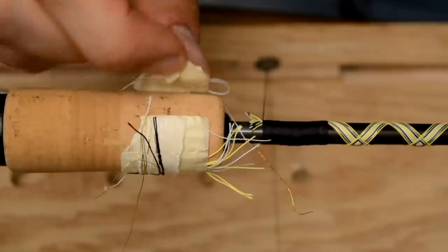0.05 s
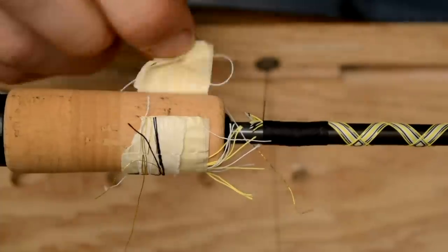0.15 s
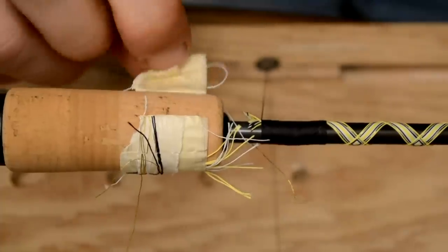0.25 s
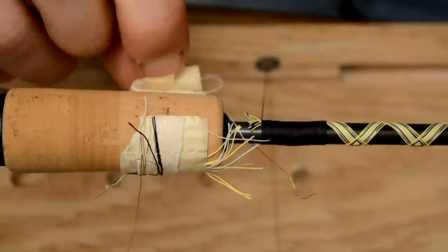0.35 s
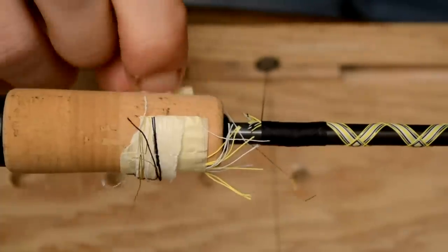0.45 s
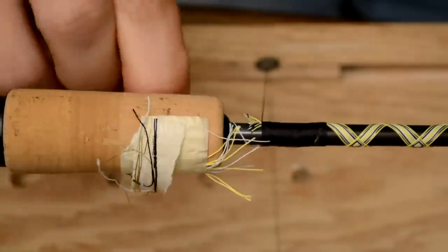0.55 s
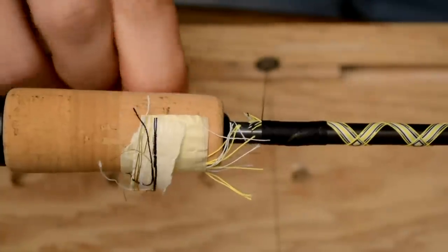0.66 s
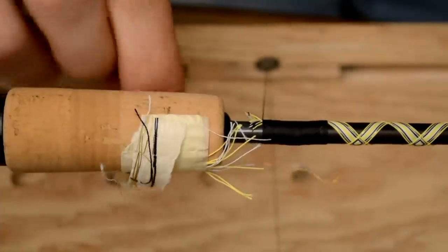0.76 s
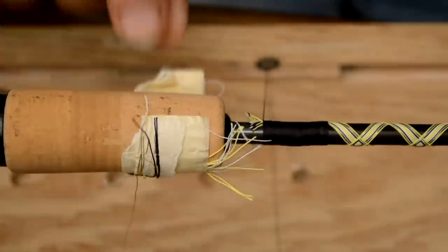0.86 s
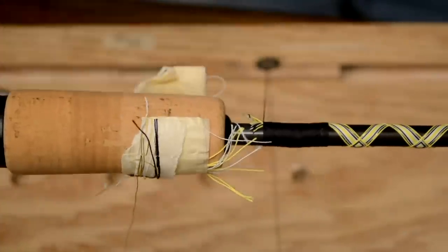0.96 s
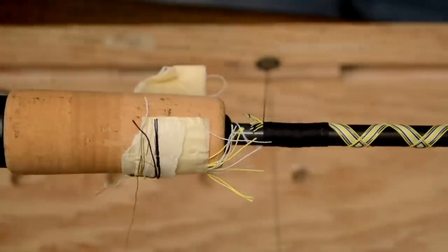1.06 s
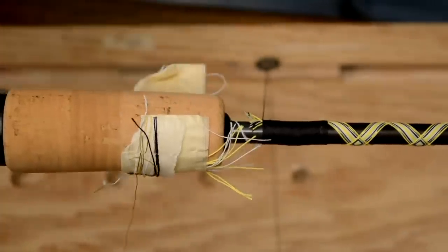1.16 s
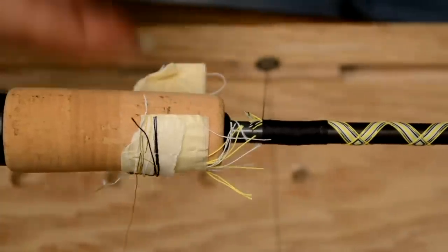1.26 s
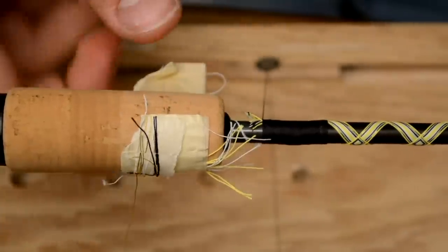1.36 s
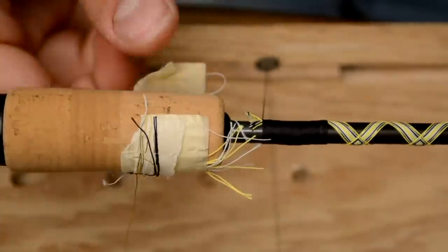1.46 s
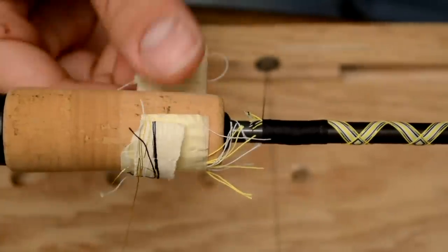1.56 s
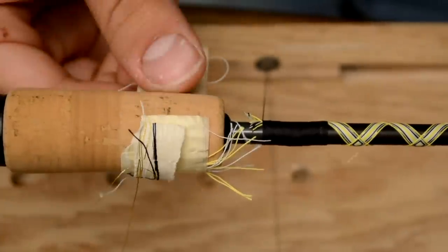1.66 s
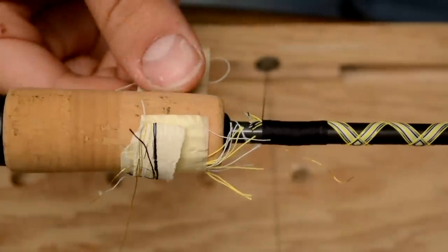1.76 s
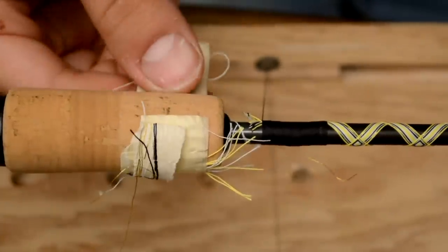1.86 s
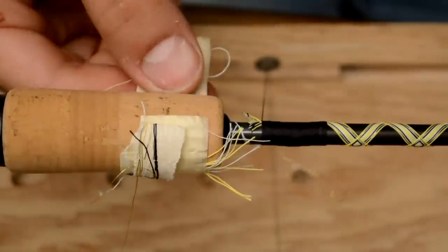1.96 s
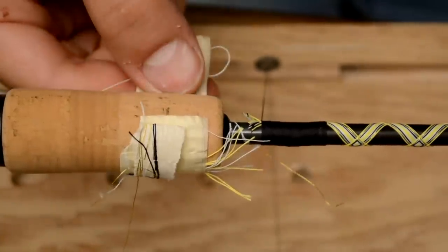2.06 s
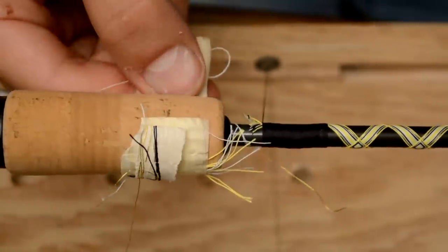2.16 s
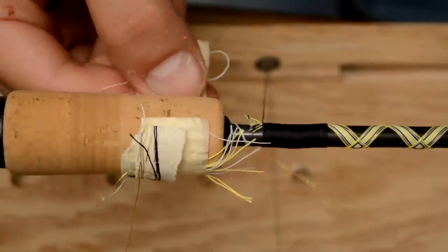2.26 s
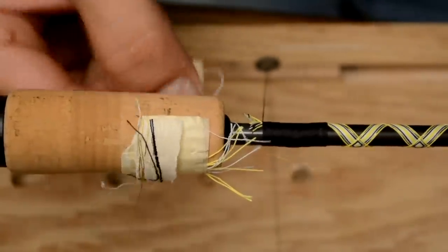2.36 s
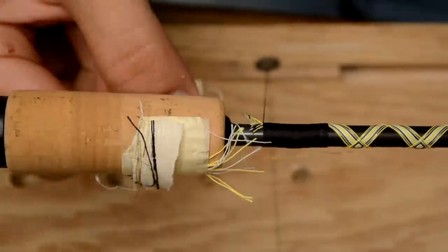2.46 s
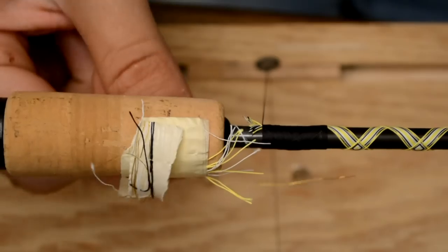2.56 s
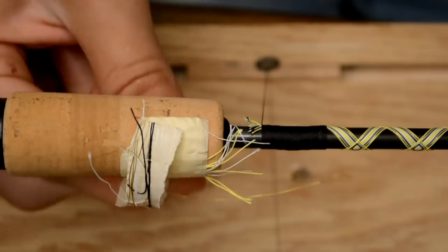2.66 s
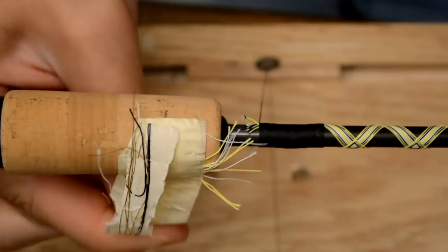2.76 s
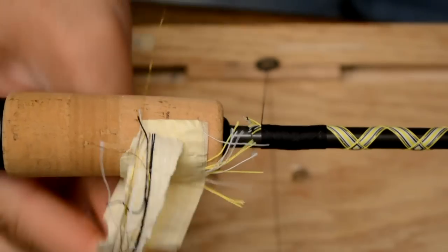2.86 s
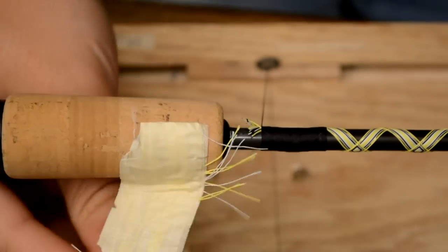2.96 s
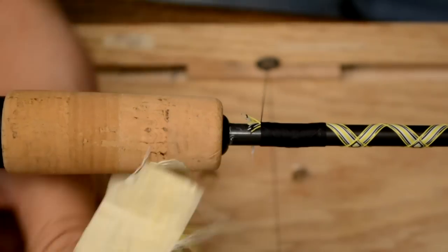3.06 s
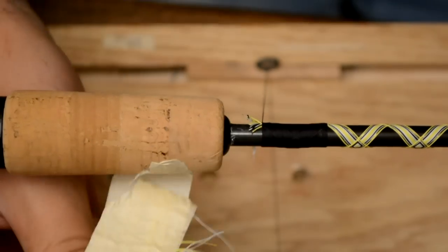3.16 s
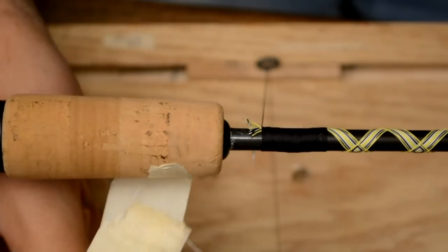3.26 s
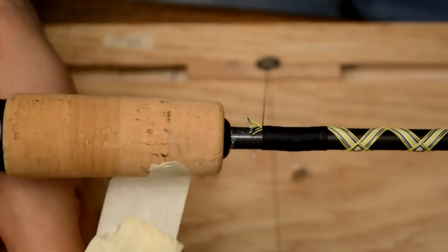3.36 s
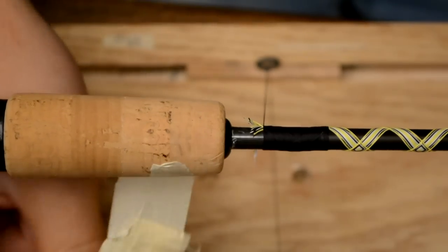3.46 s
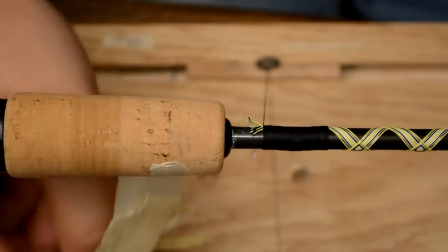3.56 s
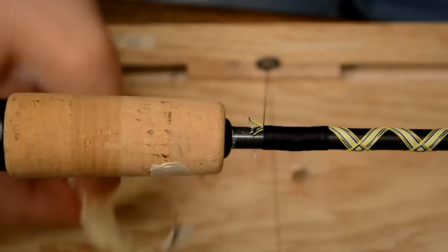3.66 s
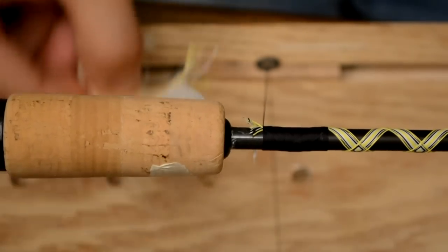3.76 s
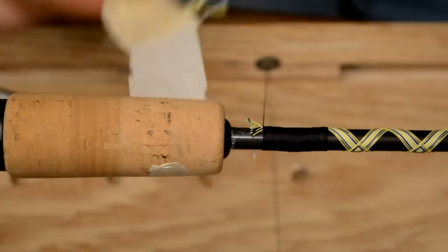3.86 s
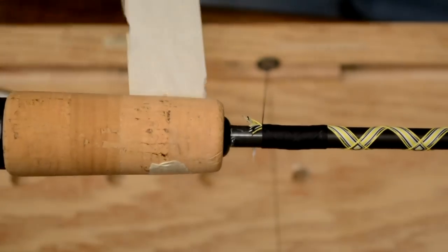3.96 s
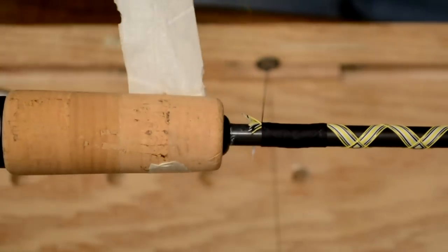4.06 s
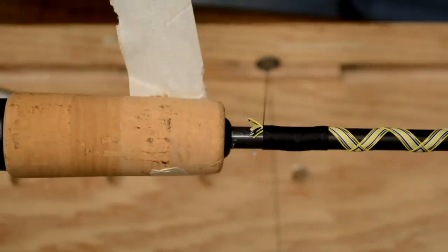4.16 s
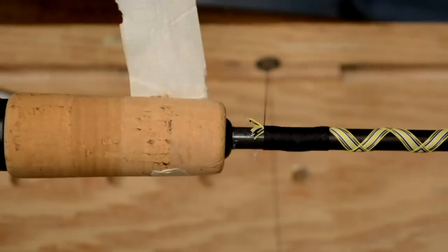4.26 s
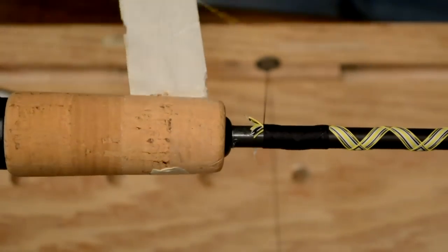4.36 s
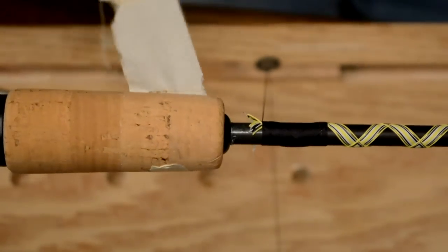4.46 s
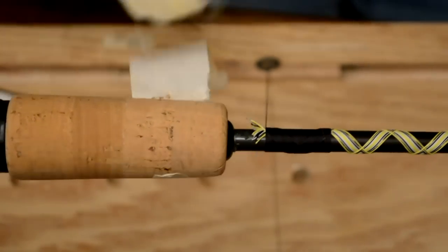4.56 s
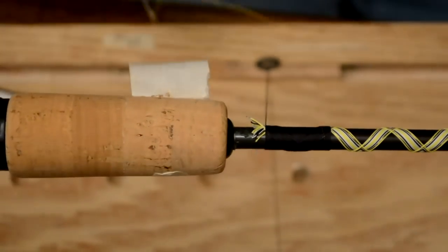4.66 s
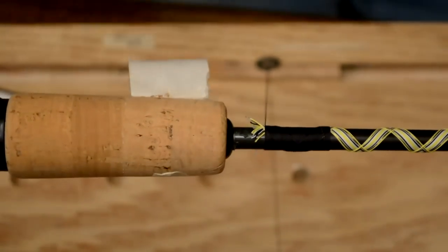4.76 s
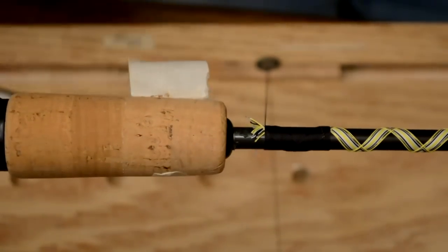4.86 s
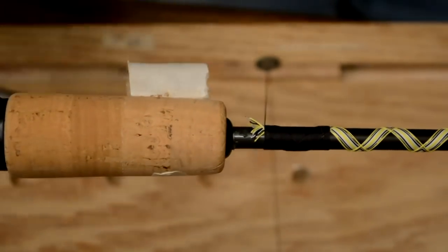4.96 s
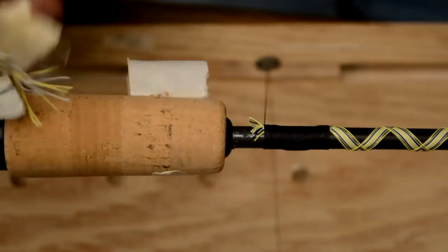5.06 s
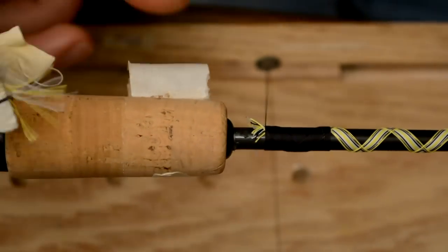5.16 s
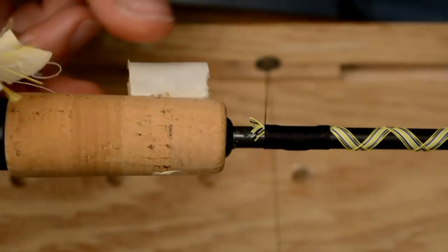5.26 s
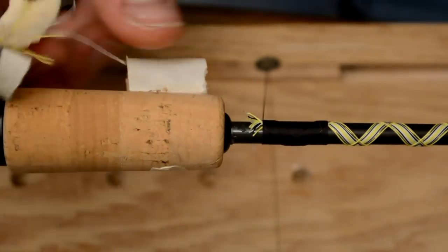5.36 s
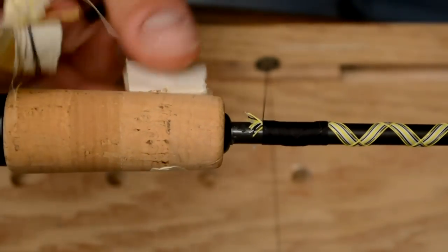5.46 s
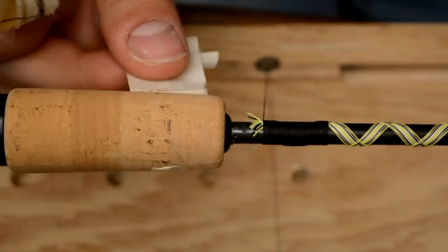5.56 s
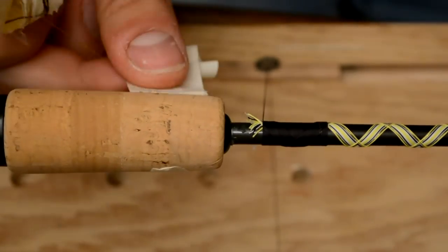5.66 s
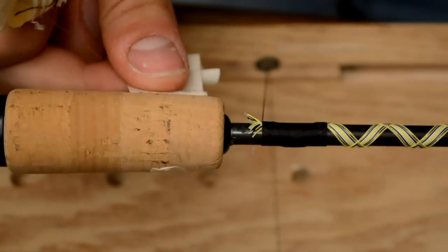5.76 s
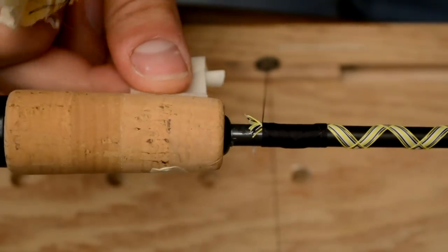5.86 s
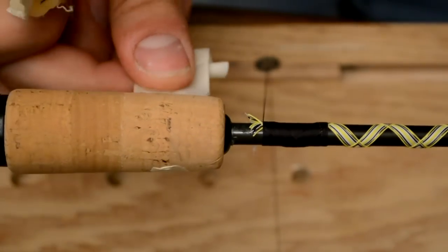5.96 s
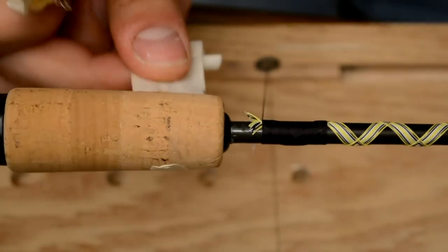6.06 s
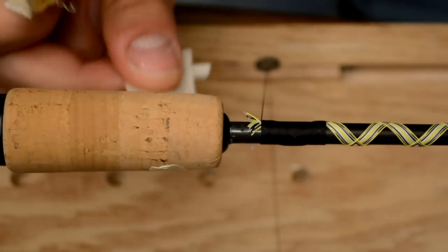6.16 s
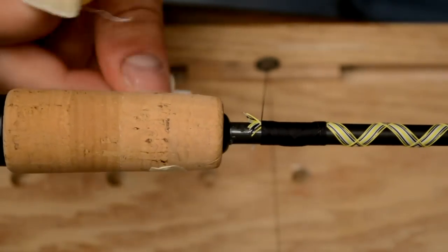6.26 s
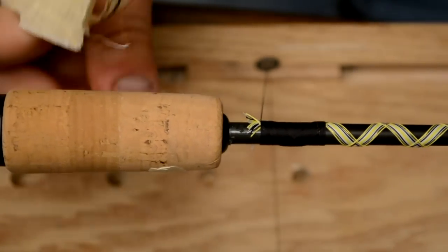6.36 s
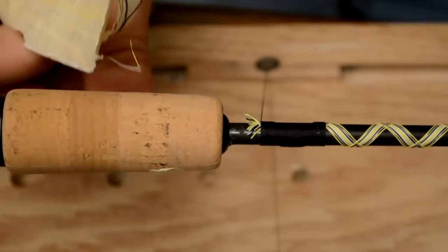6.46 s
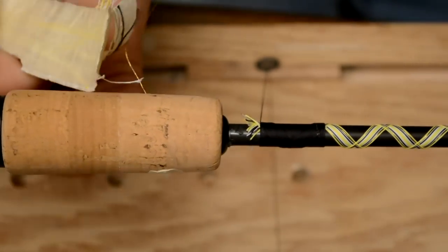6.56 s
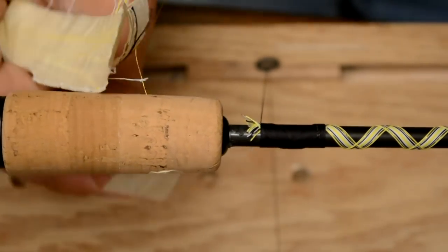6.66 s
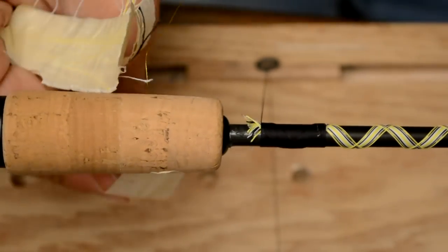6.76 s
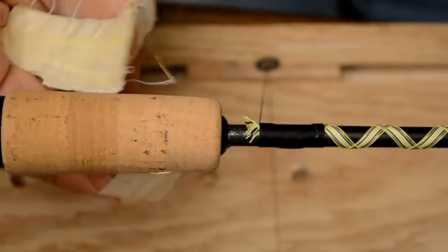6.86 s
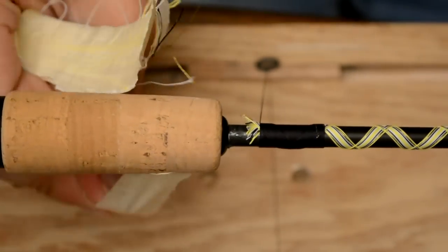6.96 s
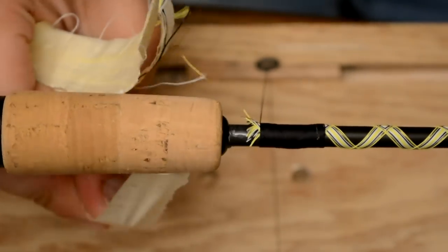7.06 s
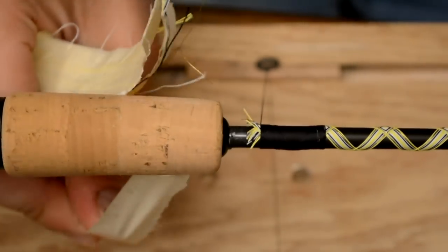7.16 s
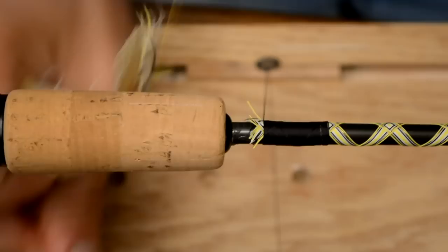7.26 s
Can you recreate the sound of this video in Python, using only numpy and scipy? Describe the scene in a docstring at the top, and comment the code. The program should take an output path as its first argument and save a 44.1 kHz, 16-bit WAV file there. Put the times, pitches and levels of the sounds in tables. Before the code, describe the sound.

Close, crisp tape rips and crackles snap in quick jerks, the thin rod knocking as it shakes, over soft steady room hiss.

```python
"""Pulling tape off a fishing rod

Masking tape and trapped thread ends are pulled off the cork grip of a rod, close to the microphone.
Each pull is a run of dry snaps (short coloured noise bursts with a ring) over a crackle of tiny clicks.
A lower stream of clicks is the shaken rod; its knocks are fading tones mixed with a short noise rattle.
Fingers rustle in between as swelling click streams. A small workshop rings for just under half a second,
made of fading noise, over soft steady hiss and a faint whine."""
import sys
import numpy as np
from scipy import signal
from scipy.fft import rfft, irfft
from scipy.io import wavfile
from scipy.ndimage import uniform_filter1d

SR = 44100
rng = np.random.default_rng(int(sys.argv[2]) if len(sys.argv) > 2 else 0)


def unload_wav(signal):
    """Save mono or channel-first audio to the path in sys.argv[1] as 16-bit WAV at rate SR, clipped to [-1, 1]."""
    wavfile.write(
        sys.argv[1],
        SR,
        np.round(np.clip(np.atleast_2d(signal).T, -1, 1) * 32767).astype(np.int16),
    )


N = 322524
TIME = np.arange(N) / SR  # seconds

# Levels in the event tables are relative: each source adds its own trim.
# snaps of the glue placed one by one, strong and weak: start_s, level_db
SNAPS = [(0.583, -9), (0.5895, -12), (0.5993, -3.5), (0.604, -7.5), (.616, -3.5), (0.6215, -17),
         (.6405, -10.5), (2.3928, -20), (2.3998, -12.5), (2.408, -8.5), (2.427, -10), (2.4392, -16),
         (2.4472, -8.5), (2.751, -2), (2.756, -8.5), (2.7645, -8), (2.7695, -10), (2.779, -1.5),
         (2.7899, -3), (2.7985, -3.5), (2.917, -10), (2.9362, -6), (2.9515, -5), (2.9901, 0.5), (3.079, -2),
         (3.0921, -6.5), (3.1031, -6), (3.148, -13), (3.16, -10), (4.497, -20), (4.5134, -19.5),
         (4.5275, -12.5), (4.541, -20), (4.5648, -10.5), (7.303, -9)]
# pulls on the tape: start_s, end_s, strip_ring_hz, treble_tilt_db_per_octave, crackle_db, rod_shudder_db
PULLS = [(0.589, 0.632, 7340, 2.5, -31, -31.5), (2.399, 2.453, 10300, 2, -39.5, -44),
         (2.74, 2.796, 7100, -1, -29, -34.5), (2.937, 2.964, 4000, 2.5, -37, -41),
         (2.978, 3.009, 4660, -3, -41, -34), (3.092, 3.149, 3160, -3, -27.5, -32.5),
         (4.494, 4.564, 9100, -2.5, -47, -40.5), (4.565, 4.583, 9000, 0.5, -61, -26.5),
         (4.589, 4.644, 5000, -4, -58, -32), (5.98, 6.098, 3300, 4, -66, -50),
         (7.3, 7.338, 3070, -1.5, -44, -45)]
# tone colour of parting tape: pitch_hz, level_db
TAPE = [(100, -53.5), (250, -17.5), (1000, -1.5), (1600, -8), (3200, 2), (5500, -1), (8500, -3),
        (11500, -4.5), (14000, -15.5), (16000, -30)]


def tape_snaps():
    """Glue lets go in snaps coloured by the nearest pull; creases flip in the loose tape as faint ticks."""
    # creases: start_s, level_db, ring_hz
    creases = [(0.308, -38, 6030), (.331, -32, 11000), (.3657, -34, 11300), (0.88, -37, 7500),
               (2.6165, -30, 3180), (2.638, -27, 9300), (3.283, -26.5, 11600), (3.303, -20, 3500),
               (4.09, -38, 5930), (4.4626, -34, 7000), (4.84, -41, 7000), (5.5554, -34, 3160),
               (5.6348, -32.5, 8750), (5.988, -27, 3400), (6.0258, -24, 3320), (6.0371, -19, 2950),
               (6.2108, -24, 2150), (6.3713, -34.5, 2930), (7.023, -36, 4500), (7.1, -32, 5000),
               (7.253, -30, 3310)]
    scatter_octaves = 0.27  # each snap rings the strip a little differently
    sag_octaves_per_s = 8.2  # the freed strip grows during a pull, so its ring falls
    out = np.zeros(N)
    for s, db in SNAPS + scattered_snaps(count=5):
        # the pull this snap belongs to, or the nearest one in time
        start, _, ring_hz, tilt_db, _, _ = min(PULLS, key=lambda pull: max(pull[0] - s, s - pull[1]))
        scatter = scatter_octaves * (2 * rng.random() - 1)
        ring_hz = ring_hz * 2 ** (scatter - sag_octaves_per_s * (s - start))
        snap = burst(ring_hz, hold_ms=1.79, tilt_db=tilt_db, rise_ms=0.47, fall_ms=1.36, ring_db=6)
        add(out, s, undb(db - 14) * snap)
    for s, db, ring_hz in creases:
        tilt_db = 1.9 * np.log2(ring_hz / 6000)  # creases with a higher ring are brighter
        # a crease rings more clearly than a snap
        tick = burst(ring_hz, hold_ms=2.2, tilt_db=tilt_db, rise_ms=0.97, fall_ms=5.4, ring_db=8.5)
        add(out, s, undb(db - 16.5) * tick)
    return out


def scattered_snaps(count):
    """Further snaps come at uneven steps through each pull, as (start_s, level_db)."""
    above_crackle_db, scatter_db = 15.5, -1
    out = []
    for start, end, _, _, crackle_db, _ in PULLS:
        times = start + (end - start) * (np.arange(count) + rng.random(count)) / count
        levels_db = crackle_db + above_crackle_db + scatter_db * rng.standard_normal(count)
        out += zip(times, levels_db)
    return out


def burst(ring_hz, hold_ms, tilt_db, rise_ms, fall_ms, ring_db):
    """A bundle of fibres gives way within milliseconds; the taut strip rings briefly."""
    ms = TIME[:1024] * 1000
    rise = np.minimum(ms / rise_ms, 1)
    fall = np.exp(-np.maximum(ms - hold_ms, 0) / fall_ms)
    x = rng.standard_normal(len(ms)) * rise * fall
    # the tilt, in dB per octave, acts above 1000 Hz
    tilted = [(hz, db + tilt_db * np.log2(max(hz, 1000) / 1000)) for hz, db in TAPE]
    x = colour(even(x, size=31), tilted)
    ring = signal.lfilter(*signal.iirpeak(ring_hz, 3.5, fs=SR), x)
    x = x + undb(ring_db) * ring
    # rms 1 over the effective length of the burst
    effective_samples = SR / 1000 * (hold_ms + fall_ms / 2)
    return x / np.sqrt(np.sum(x ** 2) / effective_samples)


def pulls():
    """Glue strands part in a dense crackle that surges after listed snaps; the jerky pull shakes the rod."""
    # tone colour of the shaking rod: pitch_hz, level_db
    shudder_colour = [(30, -10), (60, -26), (105, -47), (150, -7), (230, 4), (380, -8.5), (550, -0.5),
                      (1000, 5), (1500, -5.5), (2600, -6), (5000, -16), (12000, -50.5)]
    surge_s = 0.0044  # after a snap the peel runs on briefly before it sticks again
    surge = np.zeros(N)
    for s, db in SNAPS:
        add(surge, s, undb(db) * np.exp(-TIME[:4096] / surge_s))
    # the run-on is quieter than its snap
    crackle = undb(-21) * surge
    shudder = undb(-22) * surge
    for start, end, _, _, crackle_db, shudder_db in PULLS:
        gate = np.interp(TIME, [start, start + 0.003, end, end + 0.01], [0, 1, 1, 0])
        # hypot adds the two as powers
        crackle = np.hypot(crackle, undb(crackle_db) * gate)
        shudder = np.hypot(shudder, undb(shudder_db) * gate)
    crackle_sound = stream(2200, 0.67, TAPE, crackle)
    return crackle_sound + stream(1500, 2.84, shudder_colour, shudder)


def rod_knocks():
    """The rod knocks in its supports; strength, place and hardness of each blow set its balance of pitches."""
    # knocks: start_s, ring_db, place (0 mid-span to 1 at a support), hardness_db (more clack against the ring)
    knocks = [(.153, -39, 0.28, -15), (.298, -28, 0.18, -7), (.613, -16.5, 0.085, -14),
              (1.261, -38.5, 0.22, -18), (1.821, -34, .1, -10), (2.109, -39.5, .1, -17),
              (2.371, -18.5, 0.27, -7.5), (2.784, -18.5, .05, -0.5), (2.986, -13, 1, -4),
              (3.091, -10, 0.33, -1.5), (3.134, -15, 0.18, -7.5), (3.291, -16.5, .9, -4.5),
              (3.445, -40.5, 0.9, -6), (3.85, -38.5, .9, -12), (4.218, -21, 1, -7), (4.597, -3, 0.98, -1.5),
              (5.23, -26.5, 1, -7.5), (5.426, -23, 0.084, -7), (6.039, -33, 0.29, -7),
              (6.09, -29.5, 0.18, -8), (6.776, -35.5, .2, -14), (7.302, -30, 0.46, 1)]
    medium_db = -28.5  # the blow from which strength is counted
    out = np.zeros(N)
    for s, ring_db, place, hardness_db in knocks:
        strength_db = ring_db - medium_db
        rattle_db = -6 + 0.49 * strength_db  # soft touches ring cleanly, hard blows clatter
        bass_db = ring_db - 0.1373 * strength_db  # the bass grows more slowly than the ring in stronger blows
        thud_db = bass_db - 34 - 8.5 * place  # the low bending thud, strongest at mid-span
        support_db = bass_db - 43.5 + 10.5 * place  # the note of the support
        clack_db = ring_db + hardness_db - 24.5
        group_db = [thud_db, support_db, ring_db - 25.5, clack_db]
        add(out, s, knock(group_db, contact_s=0.0064, contact_db=rattle_db, rise_s=0.0005))
    return out


def knock(group_db, contact_s, contact_db, rise_s):
    """Each pitch group mixes any fading modes of the rod with a short rattle at the support."""
    # the rod in its supports: pitch_hz, level_db (within its group), t60_s (time to fall 60 dB)
    modes = [(176, -16.5, 0.07), (210.5, 7, 0.043), (270, -5, 0.15), (472, -2, 0.055), (465, -19, 0.15),
             (582.3, -16.5, 0.37), (630, -24, 0.025), (657, -1, 0.065), (706, -12.5, 0.23),
             (808, 0.5, 0.095), (866.3, 8, 0.094), (1019, 0, 0.087), (1132, 3, 0.02)]
    # limits of the thud, support, ring and clack groups: edge_hz
    # the clack group is a short noise rattle without tones
    edges = [0, 350, 550, 1300, 6500]
    # tone colour of the rattle: pitch_hz, level_db
    contact = [(50, -20), (100, -18), (150, -3), (240, -3), (350, -12), (470, -1), (650, 1), (950, 1),
               (1400, 1), (1800, -1), (2500, -5), (3000, -13), (3700, -15), (5000, -27), (9000, -38)]
    t = TIME[:16384]
    rattle = rng.standard_normal(len(t)) * np.exp(-t / contact_s)
    rattle = colour(even(rattle, size=35), contact)
    out = 0
    for lo, hi, db in zip(edges, edges[1:], group_db):
        ring = np.zeros(len(t))
        for hz, mode_db, t60 in [mode for mode in modes if lo < mode[0] <= hi]:
            tone = np.sin(2 * np.pi * (hz * t + rng.random()))
            ring += undb(mode_db) * fade(t, t60) * tone
        band_filter = signal.butter(2, [max(lo, 20), hi], "band", fs=SR, output="sos")
        band = signal.sosfilt(band_filter, rattle)
        out = out + undb(db) * unit(unit(ring) + undb(contact_db) * unit(band))
    return out * (1 - np.exp(-t / rise_s))


def fingers():
    """Fine crackle of crepe paper under the fingertips, and the duller rasp of skin sliding on cork."""
    # fingers stroke the tape, swelling and fading: middle_s, length_s, level_db
    strokes = [(.23, 0.075, -60), (.335, .06, -56), (0.499, 0.081, -50), (0.579, 0.057, -41.5),
               (1.582, .04, -57), (1.745, 0.046, -50.5), (2.387, 0.076, -42.5), (2.624, 0.096, -42),
               (2.742, 0.078, -41), (3.35, 0.13, -47), (3.544, 0.1, -59.5), (4.1, 0.22, -57.5),
               (4.473, 0.19, -55.5), (5.45, 0.84, -65), (6.073, 0.19, -54.5), (6.233, 0.19, -55),
               (6.432, 0.14, -51), (6.746, 0.14, -51.5), (7.052, 0.15, -50), (7.29, 0.088, -48)]
    # the hand shifts on the cork: middle_s, length_s, level_db, rasp_hz
    grips = [(.5, 0.11, -74, 3000), (2.62, 0.055, -58, 3200), (4.09, .43, -67, 6050),
             (6.039, 0.02, -40, 3100), (6.227, .06, -55.5, 2180), (6.426, .15, -60, 1250),
             (6.752, 0.074, -54, 1000), (7.048, 0.15, -58, 1900), (7.31, 0.029, -33.5, 1140)]
    # tone colours of the paper and of the skin: pitch_hz, level_db
    crepe = [(200, -7), (1500, -10), (5000, 0.5), (10000, 3), (16000, -13)]
    skin_colour = [(80, -23), (220, 1.5), (600, -2.5), (1300, 1), (2500, -4), (5000, -12), (15000, -38)]
    pressure = sum(undb(db) * swell(s, length) for s, length, db in strokes)
    uneven = undb(4 * catches(per_s=110))
    paper = stream(1200, 1.3, crepe, undb(-7.5) * pressure * uneven)
    skin = stream(1800, 2.7, skin_colour, uneven)
    slides = np.zeros(N)
    for s, length, db, rasp_hz in grips:
        rasp = signal.lfilter(*signal.iirpeak(rasp_hz, 4, fs=SR), skin)
        slides += undb(db + 0.5) * swell(s, length) * (skin + undb(2.5) * rasp)
    return paper + slides


def catches(per_s):
    """Random levels held briefly and smoothed: a fingertip sticks and slides."""
    size = int(SR / per_s)
    levels = np.repeat(rng.standard_normal(N // size + 1), size)
    return uniform_filter1d(levels, size)[:N]


def swell(middle_s, length_s):
    """A smooth rise and fall: one movement of the hand."""
    return np.exp(-(2 * (TIME - middle_s) / length_s) ** 2)


def workshop(near):
    """Direct sound and room echoes reach two close microphone ports; returns mid and side."""
    # tone colour and level of the room: pitch_hz, level_db
    room = [(60, -8), (200, -3), (450, 2), (800, -3.5), (1400, 0), (3000, -7), (6000, -6.5), (10000, -7),
            (16000, 1)]
    # side against mid, for the room and for the direct sound: pitch_hz, level_db
    room_side = [(100, -22), (700, -25), (2400, -23), (4600, -20), (6200, -10), (8000, 0), (11000, -6),
                 (15000, -8)]
    near_side = [(100, -36), (4000, -32), (8000, -14), (15000, -11)]
    sent = colour(near, room)
    mid, side = (signal.fftconvolve(sent, reverberation(build_s=0.0033))[:N] for _ in range(2))
    # a small lag between the ports gives a side signal a quarter cycle out of step
    lag_gain = undb(read(near_side, np.fft.rfftfreq(N, 1 / SR)))
    lag = irfft(1j * rfft(near) * lag_gain, N)
    return near + mid, colour(side, room_side) + lag


def reverberation(build_s):
    """Dense reflections of unit energy that build up and then die at each band's own rate."""
    # time for the echoes to fall 60 dB: pitch_hz, t60_s
    room_t60 = [(100, 0.41), (700, 0.41), (2000, 0.48), (5000, 0.44), (13000, 0.33)]
    t = TIME[:32768]
    hz = np.fft.rfftfreq(len(t), 1 / SR)
    white = rfft(rng.standard_normal(len(t)))
    out = 0
    for k, (_, t60) in enumerate(room_t60):
        # this band is full at its own pitch and blends into its neighbours
        share = read([(row[0], j == k) for j, row in enumerate(room_t60)], hz)
        out = out + irfft(white * share) * fade(t, t60)
    out = out * (1 - np.exp(-t / build_s))
    return out / np.sqrt(np.sum(out ** 2))


def hiss():
    """Steady room air with a faint whine, and microphone hiss, as mid and side."""
    # tone colour of the hiss, then its side against its mid: pitch_hz, level_db
    hiss_colour = [(25, -45), (50, 0.5), (80, -11.5), (123, 0), (165, -4), (240, 0), (400, -1.5), (700, 1),
                   (1450, -1), (3000, -7), (6000, -15.5), (10000, -21), (16000, -30)]
    hiss_side = [(60, -14), (110, -12), (200, -8.5), (380, -3.5), (700, -2.5), (1290, -3), (2380, -2.5),
                 (4400, -1), (8120, -1.5), (15000, -1)]
    # faint steady whine in the room: pitch_hz, level_db
    whine_tones = [(1461, -76), (10950, -91)]
    gain = undb(-56)
    whine = sum(undb(db) * np.sqrt(2) * np.sin(2 * np.pi * hz * TIME) for hz, db in whine_tones)
    mid = gain * noise(hiss_colour) + whine
    side = gain * colour(noise(hiss_colour), hiss_side)
    return np.array([mid, side])


def stream(per_s, spread_db, points, envelope):
    """Tiny clicks through a tone colour; the envelope sets how loud they are (rms) from moment to moment."""
    clicks = grains(per_s, spread_db)
    return colour(clicks * envelope, points) / np.std(colour(clicks, points))


def grains(per_s, spread_db):
    """Random tiny clicks, a few of them larger than the rest."""
    sizes = undb(spread_db * np.minimum(rng.exponential(size=N), 4))
    happens = rng.random(N) < per_s / SR
    return happens * sizes * rng.choice([-1, 1], N)


def noise(points):
    """Coloured noise of rms 1."""
    return unit(colour(rng.standard_normal(N), points))


def even(x, size):
    """Level the broad humps out of a noise burst, over size bins, so that only its fine texture is random."""
    power = uniform_filter1d(np.abs(rfft(x)) ** 2, size)
    hz = np.fft.rfftfreq(len(x), 1 / SR)
    return colour(x, np.c_[hz, -10 * np.log10(power)][1:])


def colour(x, points):
    """Filter with the given (pitch_hz, level_db) outline, without ringing ahead of the sound."""
    size = 2048
    outline = undb(read(points, np.fft.rfftfreq(size, 1 / SR)))
    # folding the cepstrum (spectrum of the log spectrum) gives minimum phase
    cepstrum = irfft(np.log(outline))
    cepstrum[1:size // 2] *= 2
    cepstrum[size // 2 + 1:] = 0
    response = irfft(np.exp(rfft(cepstrum)))
    return signal.fftconvolve(x, response)[:len(x)]


def read(points, hz):
    """Read (pitch_hz, value) points on a log-frequency axis."""
    f, value = np.transpose(points)
    return np.interp(np.log(hz + 1e-6), np.log(f), value)


def fade(t, t60):
    """Exponential decay that falls 60 dB in t60 seconds."""
    return np.exp(-np.log(1000) * t / t60)


def undb(db):
    """Decibels to gain."""
    return 10 ** (np.asarray(db) / 20)


def unit(x):
    """Scale to rms 1; silence stays silent."""
    return x / np.sqrt(np.mean(x ** 2) + 1e-30)


def add(track, s, sound):
    """Mix a sound in at time s, in seconds."""
    i = max(int(s * SR), 0)
    track[i:i + len(sound)] += sound[:max(N - i, 0)]


def scene():
    """All the handling in the room, left and right."""
    near = tape_snaps() + pulls() + rod_knocks() + fingers()
    # tape and a thin rod are too small to radiate deep bass
    near = signal.sosfilt(signal.butter(2, 70, "high", fs=SR, output="sos"), near)
    mid, side = np.array(workshop(near)) + hiss()
    return np.array([mid + side, mid - side])


def record(dry):
    """The recorder cuts the deep bass and the top."""
    dry = signal.sosfilt(signal.butter(3, 42, "high", fs=SR, output="sos"), dry)
    return signal.sosfilt(signal.ellip(10, .2, 70, 15900, fs=SR, output="sos"), dry)


dry = scene()
out = record(dry)
unload_wav(out)
```